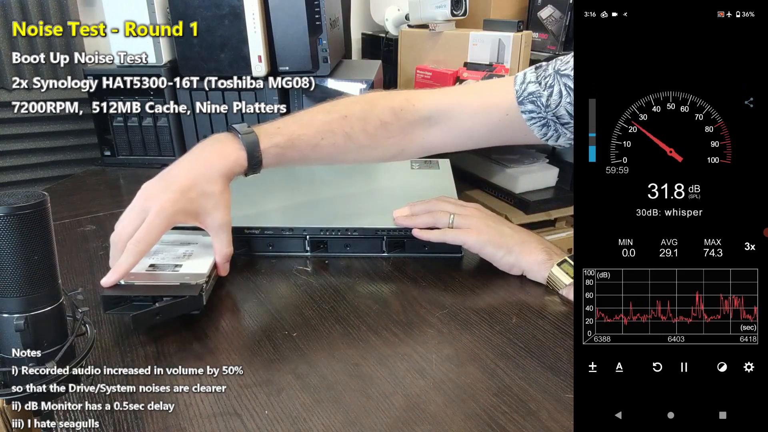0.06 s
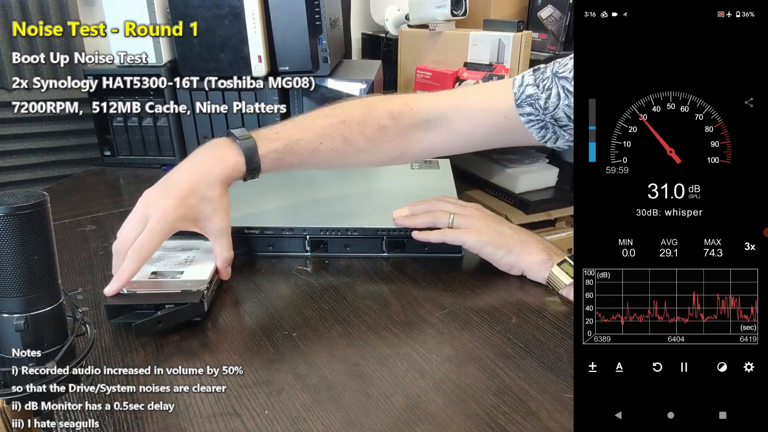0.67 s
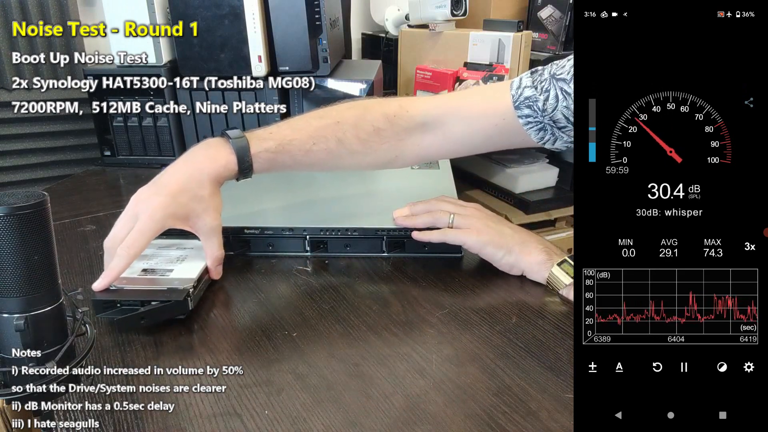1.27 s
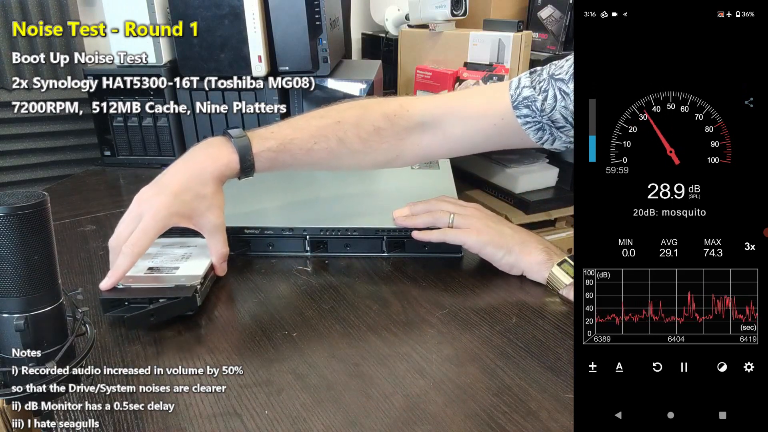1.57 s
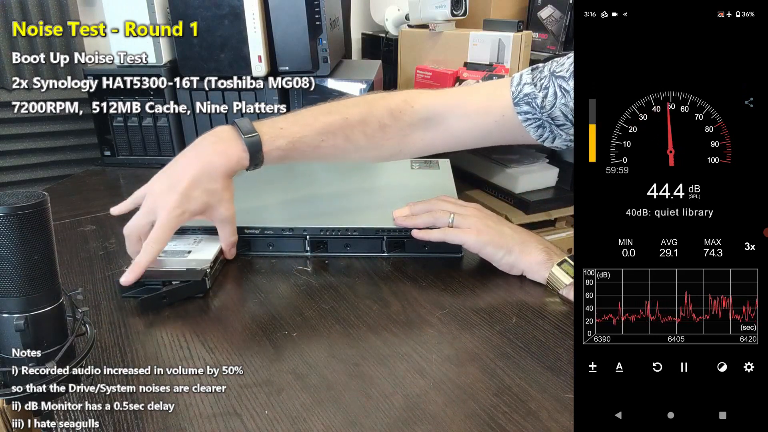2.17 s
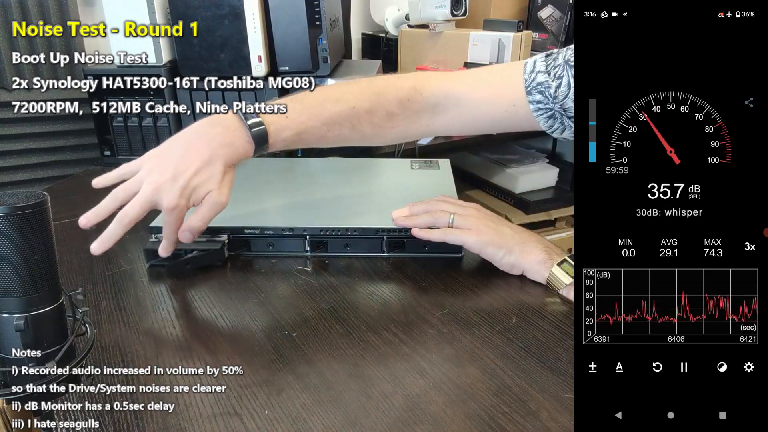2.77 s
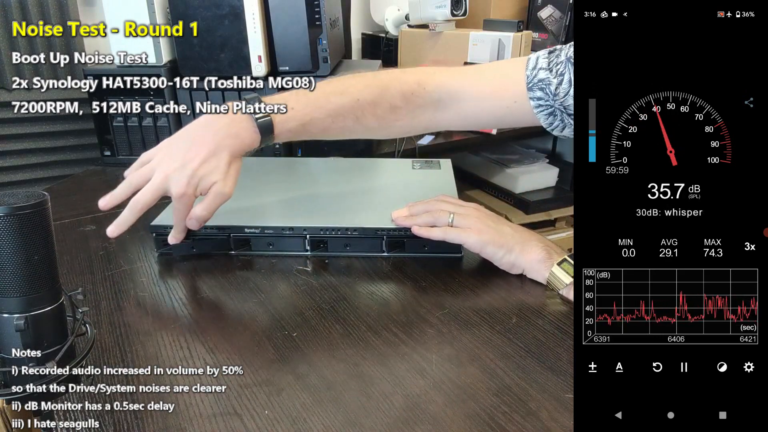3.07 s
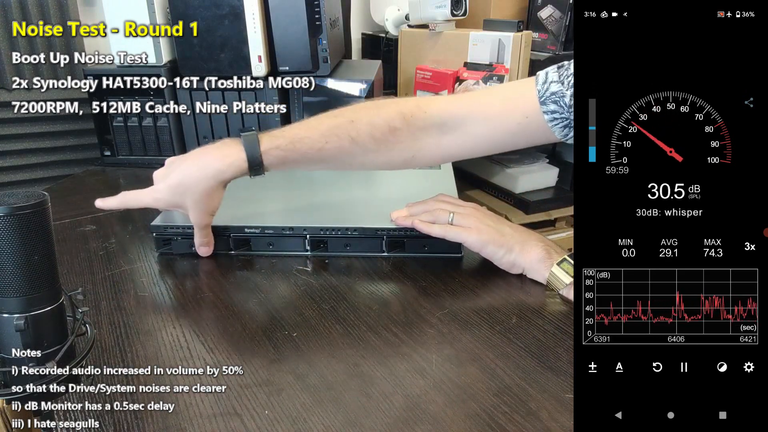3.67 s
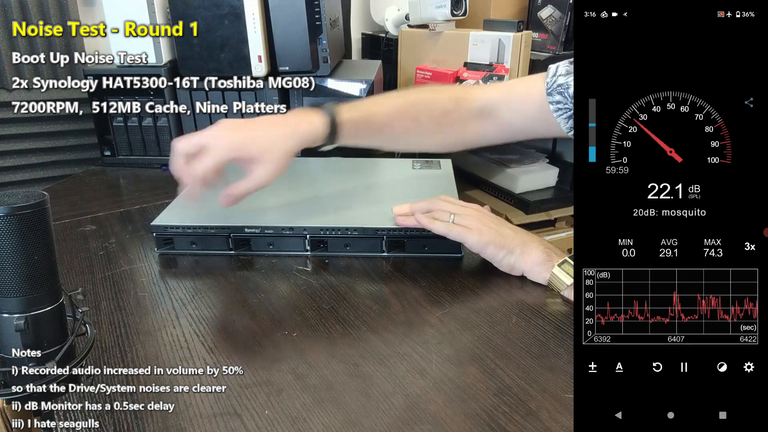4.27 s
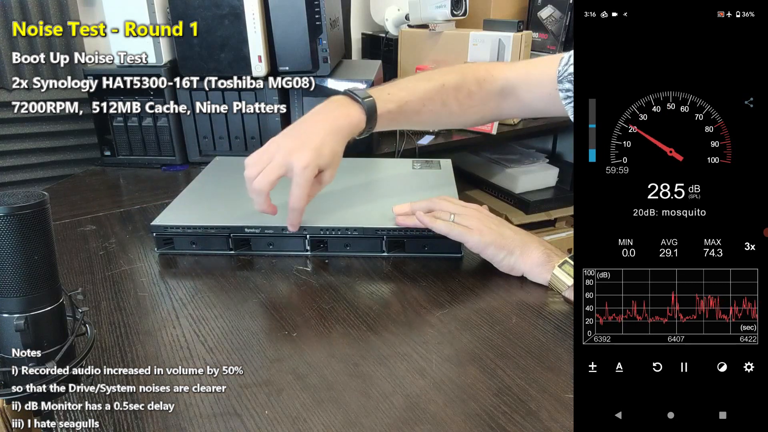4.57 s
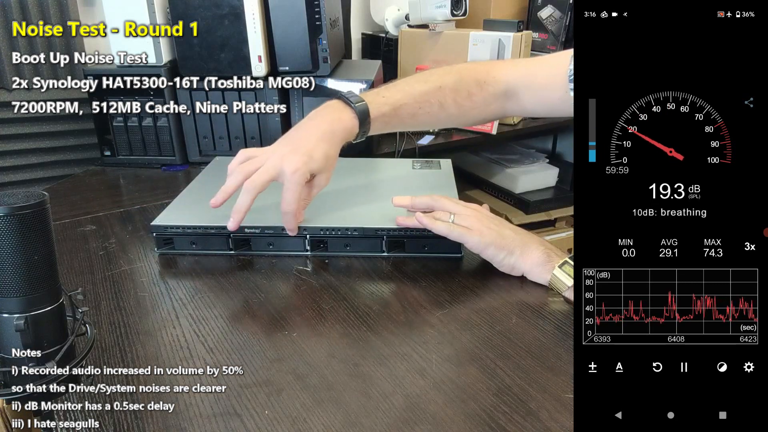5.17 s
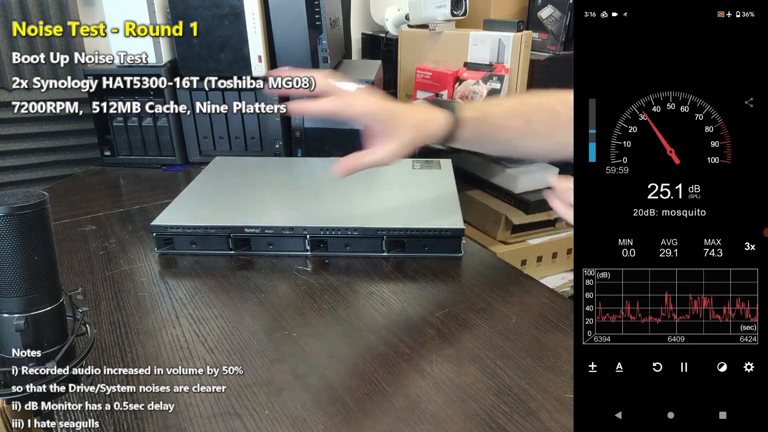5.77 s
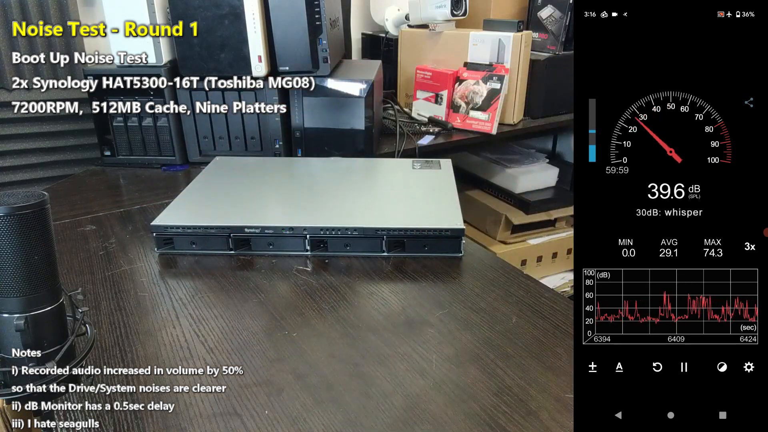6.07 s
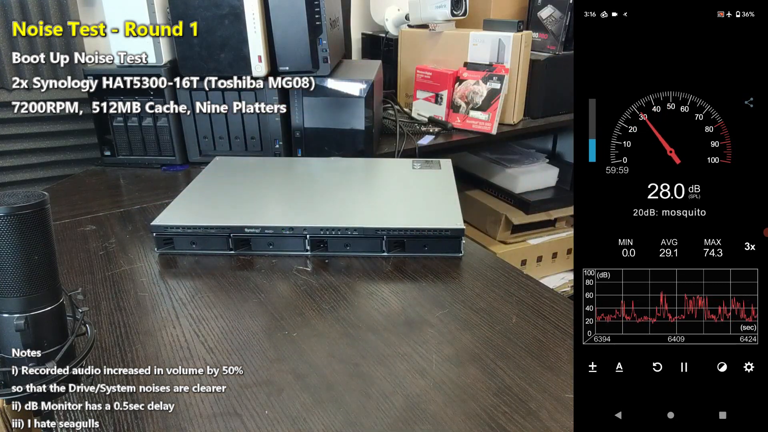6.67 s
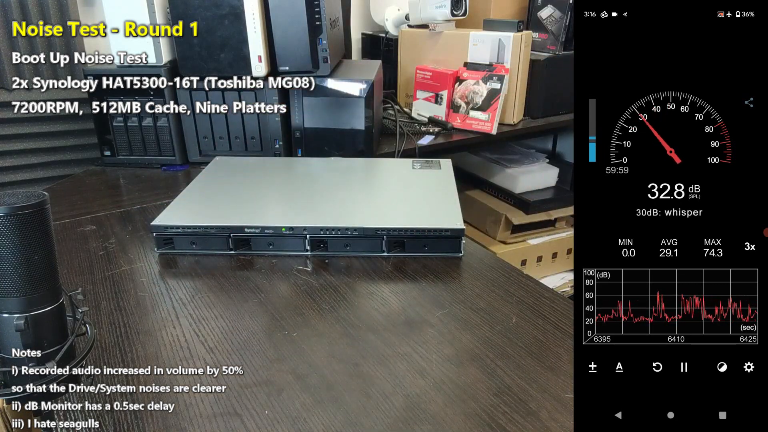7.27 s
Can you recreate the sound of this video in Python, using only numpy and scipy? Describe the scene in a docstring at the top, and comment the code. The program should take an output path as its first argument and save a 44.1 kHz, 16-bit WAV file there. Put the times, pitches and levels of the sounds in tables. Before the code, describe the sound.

Metallic clicks and soft desk thumps as a drive tray slides in and latches, followed by server fans whirring up.

```python
"""A hard-drive tray clicks and rings as it is set on a wooden desk, slid into a sheet-metal rack server
and latched shut. Each knock shakes the metal, and each push makes it scrape. Fingers click on the
front panel, and the desk thumps and booms softly under the hands. After the power button, two small
cooling fans rush up and ease back, their blades whining over the moving air.
The room is small and quiet, and the microphone is close."""
import sys
import numpy as np
from scipy import signal
from scipy.fft import rfft, irfft, next_fast_len
from scipy.io import wavfile
from scipy.ndimage import uniform_filter1d

SR = 44100
rng = np.random.default_rng(int(sys.argv[2]) if len(sys.argv) > 2 else 0)


def dump_mix(stems):
    """Bounce the given channels to the path in sys.argv[1] as a 16-bit WAV at rate SR."""
    frames = np.atleast_2d(stems).T  # one column per channel
    limited = np.clip(frames, -1, 1)  # hard clip at full scale
    pcm = np.round(limited * 32767).astype(np.int16)
    wavfile.write(sys.argv[1], SR, pcm)


N = 332073
TIME = np.arange(N) / SR
RING_TIME = TIME[:SR // 2]
LEAD = 256  # samples of sound before a blow lands

# Levels are relative. A fade time (t60) is how long a sound takes to drop by 60 dB.
# hard contacts of tray, latch and panel; body and treble are compared with the middle band:
# (time [s], level [dB], body [dB], treble [dB], contact time [s])
CONTACTS = [(0.173, -19, -14.5, -5.5, .0086), (0.1877, -32.5, 0.5, -6, 0.0084),
            (0.2085, -29, -10, -2, 0.015), (0.246, -35, -3, -4, 0.0077), (0.3093, -39, -2, -5, .006),
            (0.513, -51.5, -1, -20, .0023), (0.558, -41, -5, -1, 0.0083), (0.5875, -40.5, -3, -8, .001),
            (0.6238, -38, -0.5, -9.5, 0.009), (1.136, -48, -4.5, -12, 0.0055), (1.191, -42, 2.5, -17, .004),
            (1.6338, -24.5, -1, -5.5, 0.0064), (1.735, -40, 1, -9, .004), (1.770, -18.5, -14, -7, 0.0097),
            (1.883, -37.5, -0.5, -15, 0.0061), (1.995, -33.5, -8, -11, 0.0044),
            (2.022, -33, -1.5, -8.5, 0.01), (2.119, -39.5, -6, -6, .008), (2.1421, -32.5, -7, -8, .0025),
            (2.184, -26, -8, -11.5, 0.0075), (2.208, -31, -8, -5.5, 0.0093), (2.235, -28, -3, -6.5, 0.012),
            (2.2875, -36, -3.5, -10, 0.015), (2.3367, -43, -4.5, -2.5, 0.0016),
            (2.427, -45, 0.5, -11, 0.021), (2.659, -43, -7.5, -2.5, .004), (2.7048, -30.5, -9.5, 11, 0.003),
            (2.848, -30, -24, -1, 0.0048), (2.9534, -33.5, -14, -8, 0.0057),
            (3.0535, -33.5, -16, -6.5, .0022), (3.107, -22, -7.5, 3, 0.0031), (3.2909, -46, 3, -9, .0044),
            (3.308, -47.5, 1, -9, .003), (3.3269, -41.5, -0.5, -5, 0.0077),
            (3.5182, -51.5, 4.5, -10, 0.022), (3.597, -48.5, -8, -12, .008),
            (3.6038, -43, -8.5, -1.5, .003), (3.657, -49, -2.5, -8, .001),
            (3.8723, -17.5, -15.5, -1, 0.0019), (3.8846, -18, -5.5, -4, 0.0014),
            (4.216, -54.5, 1, -13, 0.012), (4.271, -51, 4, -11, 0.0065), (4.293, -47, 1, -7.5, 0.014),
            (4.8963, -51.5, 1, -9, 0.0035), (5.129, -40.5, 1.5, 10, 0.0026),
            (5.2271, -46, 4.5, -13, 0.0024), (5.4192, -46.5, 3.5, -5.5, 0.0091),
            (5.466, -35, -3.5, 0.5, 0.0038), (5.481, -33.5, -2.5, -2, .0076), (5.492, -38.5, 2, 0.5, 0.011),
            (5.6128, -59.5, 7.5, -1, .0067), (5.6643, -52.5, 3.5, -17, 0.01),
            (5.763, -38, -2.5, -6.5, 0.0016)]
# body, middle, treble and sizzle of a click: (low edge [Hz], high edge [Hz])
CLICK_BANDS = [(340, 1250), (1250, 3400), (4300, 8000), (8000, 16000)]
# tone colour of a blow on the panel: (frequency [Hz], level [dB])
PANEL_COLOUR = [(380, -3), (580, -14.5), (850, -4.5), (1050, -4.5), (1500, -1), (2200, -0.5), (2600, -0.5),
                (3200, -2.5), (4200, 11.5), (5300, 6.5), (6300, 8), (7500, -4.5), (9500, -6.5), (12000, -7),
                (15000, -5)]
# notes the metal case rings at: (frequency [Hz], level [dB], fade time [s])
CASE_NOTES = [(924.4, 5, 0.12), (1160, -10, 0.55), (1395, 6.5, 0.068), (1560, 4, .14), (1926, 13, 0.054),
              (2110, 10, 0.047), (2290, 7.5, 0.133), (3090, -10.5, 0.066), (3240, -11.5, 0.069),
              (3240, -6, 0.06), (4130, -3, 0.123), (4610, 8.5, 0.0415), (5310, -26.5, 0.047),
              (5960, 11, 0.07), (5920, 10, 0.1), (6140, -4.5, 0.05), (6740, 7, 0.16)]
# blows that ring the tray: (time [s], level [dB], favoured frequency [Hz])
TRAY_HITS = [(0.171, -27, 1900), (.21, -23, 1850), (0.244, -38.5, 3320), (0.309, -38.5, 1260),
             (1.635, -25, 3240), (1.77, -33, 1400), (2.233, -31, 3100), (2.705, -16.5, 3200),
             (3.106, -24, 7050)]
# notes the tray rings at: (frequency [Hz], level [dB], fade time [s])
TRAY_NOTES = [(1160, -29.5, 0.26), (1298, -5.5, 0.12), (1662, -22.5, 0.11), (1770, -4.5, 0.12),
              (1884, -8.5, 0.14), (1958, -7, 0.052), (2270, -13, 0.059), (3097, -5.5, 0.04),
              (3057, -0.5, 0.012), (3280, -9, .07), (5430, 3, 0.06), (6740, -10.5, 0.053), (7350, 7, .07),
              (7610, -8.5, .06)]
# springs ticking in the tray guide and power button: (time [s], level [dB], fade time [s])
SPRING_TICKS = [(2.9531, -31.5, 0.026), (4.8957, -52, .02), (5.129, -29.5, 0.016), (5.466, -31, .02),
                (5.481, -24.5, .04)]
# pushes on the tray: (start [s], length [s], level [dB], brightness [dB], rumble [dB])
PUSHES = [(1.397, 0.058, -52, -6, -36.5), (1.568, 0.34, -48.5, -4, -39.5), (1.981, 0.062, -46.5, -1, -38),
          (2.134, .18, -48.5, 0, -31.5), (2.645, .06, -47, 3, -41.5), (2.736, 0.17, -41.5, 2.5, -37.5),
          (2.943, .06, -48.5, -5, -47), (3.046, 0.077, -38, -0.5, -36.5)]
# tone colour of the rubbing surfaces: (frequency [Hz], level [dB])
SCRAPE_COLOUR = [(500, -2), (900, -0.5), (1700, 1), (2400, -3), (3300, 0.5), (4500, -1.5), (6200, -8.5),
                 (8500, -7), (13000, -8), (16000, -11.5)]
# low, middle and high parts of the scrape: (low edge [Hz], high edge [Hz])
SCRAPE_BANDS = [(600, 2500), (2500, 7000), (7000, 16000)]
# strength of those parts: (level [dB], share of brightness [dB per dB])
SCRAPE_MIX = [(0, -1), (1.5, 0.5), (-4.5, 1.5)]
# ringing of the gap behind the tray: (time [s], frequency [Hz], level [dB])
BAY_GAP = [(2.74, 5630, -68), (2.81, 4600, -40), (2.87, 2740, -41), (2.92, 1977, -37), (2.98, 1560, -52.5),
           (3.05, 1660, -79)]
# weight landing on the desk and in the bay: (time [s], level [dB], tilt to treble [dB per octave])
LANDINGS = [(0.172, -35, -3.5), (0.212, -34.5, 3), (0.621, -31.5, -1.5), (1.194, -35, 0),
            (1.61, -29.5, -2.5), (1.637, -28.5, 7), (1.736, -34.5, -4), (1.772, -28.5, 1.5),
            (1.991, -26.5, -3.5), (2.119, -30, -6.5), (2.143, -29, -5), (2.184, -23, -3.5),
            (2.21, -31.5, 1.5), (2.24, -34, 8), (2.29, -33.5, -4), (2.337, -37, -7.5), (2.527, -42.5, -6),
            (2.707, -25.5, -3.5), (2.955, -36, -6.5), (3.057, -37.5, -10), (3.11, -28.5, .5),
            (3.514, -42.5, -3), (3.885, -29.5, 0.5), (3.896, -29.5, 4), (5.484, -40, -1),
            (5.767, -48.5, -3.5)]
# low, middle and high parts of a thump: (low edge [Hz], high edge [Hz])
THUMP_BANDS = [(40, 110), (110, 260), (260, 680)]
# strength of those parts: (centre [Hz], level [dB])
THUMP_MIX = [(66, -8), (170, -1.5), (420, -1.5)]
# notes the desk rings at: (frequency [Hz], level [dB], fade time [s])
DESK_NOTES = [(78.5, -4, 0.21), (119, -10, 0.13), (142.2, 0.5, 0.22), (184.5, -8, 0.16), (235, -9, 0.14),
              (334.7, 2, .09), (425.7, 1.5, 0.16), (564, -6, 0.14)]
# hands leaning on the desk: (time [s], level [dB], fade time [s])
HAND_LEANS = [(0.17, -25, 0.69), (0.559, -28.5, 1.5), (1.19, -38, 5), (1.76, -34, 1.1), (2.22, -28.5, 1.8),
              (2.74, -31.5, 1.1), (3.13, -32.5, 1.9), (3.52, -34.5, 1.38), (4.22, -41.5, 1.55),
              (5.461, -34, 0.76), (5.77, -37.5, 1.27), (7.24, -45, 0.73)]
# how fast the fans spin: (time [s], speed [turns per second])
FAN_SPEED = [(6.0, 60), (6.25, 88.3), (6.45, 112.4), (6.6, 121.2), (6.75, 127), (6.9, 130), (7.1, 118.5),
             (7.3, 106.8), (7.53, 100.6)]
# tones of a fan: (rate [cycles per turn], level [dB])
BLADE_TONES = [(1, -20.5), (3, -15), (5, -10), (7, -10.5), (10, -19.5), (15, -24.5), (20, -34.5)]
# pitches the case makes louder: (frequency [Hz], width [Hz], boost [dB])
CASE_BOOSTS = [(632, 9.5, 4.5), (1640, 100, 11.5), (1980, 37, 11)]
# notes of the air inside the case: (frequency [Hz], level [dB], fade time [s])
AIR_NOTES = [(398, -10.5, 0.027), (447, -5.5, 0.1), (810, -3, 0.035), (910, -13, 0.013)]
# tone colours of fan air, its bright rush, sliding weight, hands and room: (frequency [Hz], level [dB])
AIR_COLOUR = [(60, -40.5), (100, -21), (170, -19), (278, -11), (390, -5), (520, -10.5), (620, -3.5),
              (710, -6), (870, -4), (1080, -9), (1900, -16.5), (3000, -23), (5100, -33), (6100, -29),
              (6800, -36), (8000, -43), (14000, -45)]
RUSH_COLOUR = [(600, -5), (1200, 5), (2000, 1.5)]
RUMBLE_COLOUR = [(50, -2), (110, -8), (220, -6.5), (600, -14), (1500, -47)]
BRUSH_COLOUR = [(150, -22), (300, -1), (1000, -16), (1400, -26), (5000, -49)]
ROOM_COLOUR = [(12, -48.5), (20, -11), (63, -9), (77, -21.5), (93, -20), (228, -21), (377, -28.5),
               (410, -30), (1190, -37.5), (1440, -31), (1610, -37.5), (4060, -42), (4420, -42), (5380, -44),
               (16000, -46)]


def clicks(gain_db=0.5, case_db=-18.5, scuff_db=-22, buzz_db=-14, hollow_db=-5.5, sizzle_share=1.32):
    """Each contact is a short scuff, a sharp chatter and a buzz of loose parts, all ringing the case."""
    out = np.zeros(N)
    for s, db, body_db, treble_db, contact_s in CONTACTS:
        drag = contact_s / 0.0011  # longer contacts scuff more and shake more loose
        strike = np.exp(-RING_TIME / contact_s)
        buzz = gain(buzz_db) * np.sqrt(drag) * fade(t60=0.063)
        force = chatter(np.hypot(strike, buzz), even_hz=890)
        scuff = np.linspace(0, 1, LEAD) ** 2 * rng.standard_normal(LEAD)
        force[:LEAD] += gain(scuff_db) * drag * np.std(force[LEAD:2 * LEAD]) * scuff
        # the hollow plastic front holds the middle band a little longer
        force += gain(hollow_db) * band(chatter(fade(t60=0.11), even_hz=384), (1000, 2600), order=2)
        case = gain(case_db) * ring(gripped(CASE_NOTES), size=len(force))
        click = colour(through(force, case), PANEL_COLOUR)
        levels_db = db + np.array([body_db, 0, treble_db, sizzle_share * treble_db])
        add(out, s - LEAD / SR, balance(click, CLICK_BANDS, levels_db, span_s=0.0065))
    return out * gain(gain_db)


def tray_ring(spread_octaves=0.38, hum_hz=205, hum_db=-31):
    """The metal tray rings; the spot that is struck decides which notes are loudest."""
    out = np.zeros(N)
    for s, db, favoured_hz in TRAY_HITS:
        metal = ring([(hz, note_db - 6 * (np.log2(hz / favoured_hz) / spread_octaves) ** 2, t60)
                      for hz, note_db, t60 in TRAY_NOTES])
        add(out, s, gain(db) * metal / np.std(metal[:SR // 100]))
    # on first touching down, the frame also bends and hums
    hum = gain(hum_db) * fade(t60=0.62) * np.sin(2 * np.pi * hum_hz * RING_TIME)
    add(out, TRAY_HITS[0][0], hum)
    return out


def springs(band_hz=(9000, 15500)):
    """A small spring flips over with a thin, bright snap."""
    out = np.zeros(N)
    for s, db, t60 in SPRING_TICKS:
        snap = band(chatter(fade(t60), even_hz=1500), band_hz, order=2)
        add(out, s - LEAD / SR, gain(db) * snap / np.std(snap[LEAD:2 * LEAD]))
    return out


def tray_slide(catches_per_s=120, case_db=-13.5, desk_db=-22.5, rise_s=0.018, fall_s=0.023):
    """Tiny bumps and catches scrape the case while the drive's weight rumbles on the desk."""
    case = gain(case_db) * ring(CASE_NOTES)
    grains = rng.standard_normal(N) * gain(0.5 * drift(900) + 2 * drift(60))
    snags = rng.exponential(size=N) * (rng.random(N) < catches_per_s / SR)
    catches = signal.fftconvolve(snags, fade(t60=0.007))[:N]
    grains *= 1 + gain(-3) * catches
    rub = colour(through(grains, case), SCRAPE_COLOUR)
    parts = [unit(band(rub, edges)) for edges in SCRAPE_BANDS]
    desk = through(rng.standard_normal(N), gain(desk_db) * ring(DESK_NOTES))
    rumble = gain(-2) * unit(colour(desk, RUMBLE_COLOUR))
    out = np.zeros(N)
    for s, length, db, bright_db, rumble_db in PUSHES:
        scrape = sum(gain(db + base_db + share * bright_db) * part
                     for part, (base_db, share) in zip(parts, SCRAPE_MIX))
        push = np.exp(np.minimum(TIME - s, 0) / rise_s - np.maximum(TIME - s - length, 0) / fall_s)
        out += push * (scrape + gain(rumble_db) * rumble)
    return out


def bay_scrape(width_hz=1400, grit_db=1.5):
    """A gritty scrape drops in pitch as the gap behind the tray gets shorter."""
    hz, db = curves(BAY_GAP)
    inside = (TIME > BAY_GAP[0][0]) & (TIME < BAY_GAP[-1][0])
    return inside * gain(db) * unit(pitched_noise(hz, width_hz) * gain(grit_db * drift(300)))


def grip_rub(s=0.598, db=-47):
    """The tray rubs briefly as the grip on it changes."""
    grains = rng.standard_normal(N) * gain(2.7 * drift(700))
    return gain(db) * swell(s, width_s=0.026) * unit(band(grains, (900, 3600), order=1))


def tray_squeak(hz=4500, wander_hz=90, db=-62):
    """The tray squeaks thinly just before it touches down."""
    cycles = np.cumsum(hz + wander_hz * drift(500)) / SR
    loudness = np.interp(TIME, [.02, .09, .165, .175], [0, 1, 1, 0])
    return gain(db) * loudness * np.sin(2 * np.pi * cycles)


def desk_thumps(gain_db=-1, desk_db=-19, rattle_db=-15, shudder_db=-10):
    """Weight lands with a short push and a rattle, then the desk top shudders on."""
    out = np.zeros(N)
    desk = gain(desk_db) * ring(DESK_NOTES)
    middle_hz = THUMP_MIX[1][0]
    for s, db, tilt_db in LANDINGS:
        levels_db = [db + base_db + tilt_db * np.log2(hz / middle_hz) for hz, base_db in THUMP_MIX]
        force = chatter(fade(t60=0.013) + gain(rattle_db) * fade(t60=0.22), even_hz=137.6, size=16384)
        shudder = band(chatter(fade(t60=0.46), even_hz=130.3, size=16384), (45, 420), order=2)
        thump = through(force + gain(shudder_db) * shudder, desk)
        add(out, s - LEAD / SR, balance(thump, THUMP_BANDS, levels_db, span_s=0.021))
    return out * gain(gain_db)


def desk_boom(hz=62, wander_hz=1.5, rise_s=0.026, gain_db=-2, rumble_db=-4):
    """A deep note of the desk swells at each lean of the hands, wavers and dies away."""
    power = np.zeros(N)
    for s, db, t60 in HAND_LEANS:
        age = np.maximum(TIME - s, 0)
        power += (gain(db) * (1 - np.exp(-age / rise_s)) * fade(t60, age)) ** 2
    cycles = np.cumsum(hz + wander_hz * drift(15)) / SR
    note = unit(np.sin(2 * np.pi * cycles))
    rumble = unit(band(rng.standard_normal(N), (38, 84), order=2))
    return gain(gain_db) * np.sqrt(power) * (note + gain(rumble_db) * rumble)


def hand_brush(s=5.995, db=-54):
    """The hands draw away with a soft, dull brush."""
    rub = unit(colour(rng.standard_normal(N), BRUSH_COLOUR))
    ringing = gain(-5) * pitched_noise(hz=915, width_hz=190)
    return gain(db) * swell(s, width_s=0.031) * (rub + ringing)


def fans(db=-39.5, db_per_octave=13.5, waver_db=2.5, jitter=0.0017):
    """Two fans at slightly different speeds whine over rushing air, louder and brighter when faster."""
    turns_per_s, octaves = fan_speed()
    tones = 0
    for speed_ratio, fan_db in ((1, 0), (0.98, -9)):
        turns = np.cumsum(speed_ratio * turns_per_s * (1 + jitter * drift(60))) / SR
        for per_turn, tone_db in BLADE_TONES:
            boost_db = sum(peak_db / (1 + ((per_turn * turns_per_s - hz) / width) ** 2)
                           for hz, width, peak_db in CASE_BOOSTS)
            loudness = gain(tone_db + boost_db + fan_db + waver_db * drift(17))
            tones += loudness * np.sin(2 * np.pi * per_turn * turns)
    air = through(rng.standard_normal(N), gain(-22) * ring(AIR_NOTES))
    air = unit(colour(air, AIR_COLOUR))
    air += colour(air, RUSH_COLOUR) * (gain(7 * octaves) - 1)  # brighter with speed
    air *= gain(-1 + 0.24 * drift(12))
    whine = gain(2 + 10 * octaves) * tones
    powered = np.interp(TIME, [5.98, 6.13], [0, 1])
    return powered * gain(db + db_per_octave * octaves) * (air + whine)


def case_whirr(db=-51, db_per_octave=2):
    """The case gives a low whirr as the fans start; it grows only a little with speed."""
    _, octaves = fan_speed()
    started = np.interp(TIME, [6.06, 6.14], [0, 1])
    whirr = unit(band(pitched_noise(hz=400, width_hz=170), (180, 700), order=2))
    return started * gain(db + db_per_octave * octaves) * whirr


def room_echo(t60=0.25, dull_hz=4400):
    """Countless weak reflections blur into one short tail, duller above dull_hz."""
    soften = signal.butter(1, dull_hz, fs=SR, output="sos")
    tail = signal.sosfilt(soften, rng.standard_normal(len(RING_TIME))) * fade(t60)
    return tail / np.linalg.norm(tail)


def room_tone(db=-57):
    """A faint, steady rumble and microphone hiss."""
    noise = colour(rng.standard_normal(N), ROOM_COLOUR)
    return gain(db) * noise / np.std(band(noise, (100, 16000)))


def fan_speed():
    """Turns per second, and how many octaves (doublings) that is above 120."""
    turns_per_s, = curves(FAN_SPEED)
    return turns_per_s, np.log2(turns_per_s / 120)


def gripped(notes, detune=0.012):
    """A hand's pressure shifts each note a little from blow to blow."""
    return [(hz * (1 + detune * rng.standard_normal()), db, t60) for hz, db, t60 in notes]


def ring(notes, size=SR // 2):
    """A struck object sounds all its notes at once, each fading at its own pace."""
    t = RING_TIME[:size]
    sound = sum(gain(db) * fade(t60, t) * np.sin(2 * np.pi * (hz * t + rng.random()))
                for hz, db, t60 in notes)
    return sound / np.linalg.norm(sound)


def chatter(shape, even_hz, size=8192):
    """Tiny impacts follow a loudness shape, their energy evened out over bands even_hz wide."""
    spectrum = rfft(np.roll(rng.standard_normal(size) * shape[:size], LEAD))
    power = uniform_filter1d(np.abs(spectrum) ** 2, int(even_hz * size / SR))
    return irfft(spectrum / np.sqrt(np.abs(power) + 1e-12))


def pitched_noise(hz, width_hz):
    """Noise gathered around a pitch that may move."""
    phase = 2 * np.pi * np.cumsum(hz * np.ones(N)) / SR
    return drift(width_hz) * np.cos(phase) + drift(width_hz) * np.sin(phase)


def balance(blow, bands_hz, levels_db, span_s):
    """Set how loud each band of a blow is over its first span_s seconds."""
    parts = [band(blow, edges, order=5) for edges in bands_hz]
    onset = slice(LEAD, LEAD + int(span_s * SR))
    return sum(gain(db) * part / np.std(part[onset]) for part, db in zip(parts, levels_db))


def through(x, response):
    """The direct sound plus what it sets ringing."""
    return x + signal.fftconvolve(x, response)[:len(x)]


def colour(x, points):
    """Turn frequencies up or down along (frequency [Hz], level [dB]) points."""
    hz, db = np.transpose(points)
    size = next_fast_len(len(x))
    bins_hz = np.arange(size // 2 + 1) * SR / size
    gains = gain(np.interp(np.log(bins_hz + 1), np.log(hz), db))
    return irfft(rfft(x, size) * gains, size)[:len(x)]


def band(x, edges_hz, order=3):
    """Keep the frequencies between two edges."""
    return signal.sosfilt(signal.butter(order, edges_hz, "band", fs=SR, output="sos"), x)


def drift(per_s):
    """A smooth random wobble of size about 1."""
    step = int(SR / per_s)
    stairs = np.repeat(rng.standard_normal(N // step + 1), step)[:N]
    return unit(uniform_filter1d(stairs, step))


def fade(t60, t=RING_TIME):
    """Die away by 60 dB in t60 seconds."""
    return np.exp(-np.log(1000) * t / t60)


def swell(s, width_s):
    """A smooth rise and fall around time s."""
    return np.exp(-.5 * ((TIME - s) / width_s) ** 2)


def curves(table):
    """Join each column's values with straight lines in time."""
    times, *columns = np.transpose(table)
    return [np.interp(TIME, times, column) for column in columns]


def gain(db):
    """Turn decibels into a multiplier."""
    return 10 ** (np.asarray(db) / 20)


def unit(x):
    """Scale to an average strength (rms) of 1."""
    return x / np.sqrt(np.mean(x ** 2) + 1e-20)


def add(out, s, sound):
    """Mix a sound in at time s."""
    start = int(s * SR)
    out[start:start + len(sound)] += sound[:N - start]


def scene():
    """The tray is handled in the small room, then the fans start."""
    handling = clicks() + springs() + tray_ring() + grip_rub()
    handling += tray_slide() + bay_scrape() + tray_squeak()
    handling = through(handling, gain(-15) * room_echo())
    desk = desk_thumps() + desk_boom()
    return (handling + desk + hand_brush() + fans() + case_whirr() + room_tone())[None]


def record(dry, top_hz=15900):
    """Clip any peak beyond full scale, then cut off the highest treble."""
    treble_cut = signal.ellip(10, .2, 70, top_hz, fs=SR, output="sos")
    return signal.sosfilt(treble_cut, np.clip(dry, -1, 1))


dry = scene()
out = record(dry)
dump_mix(out)
```